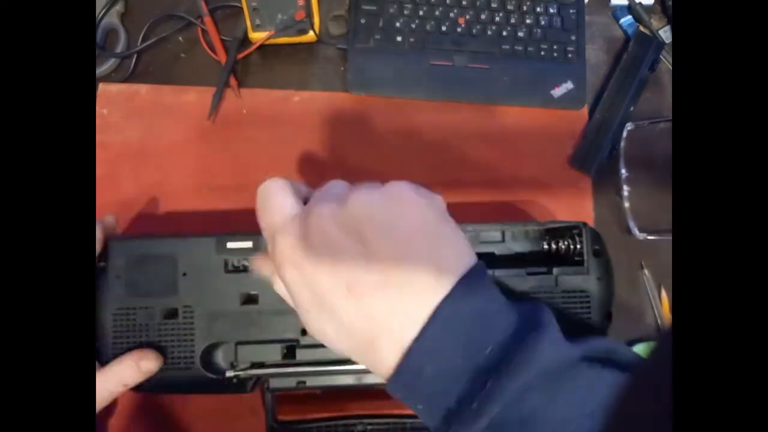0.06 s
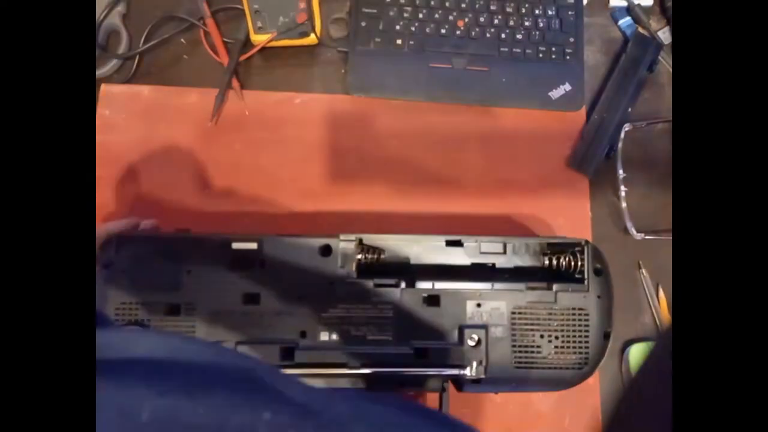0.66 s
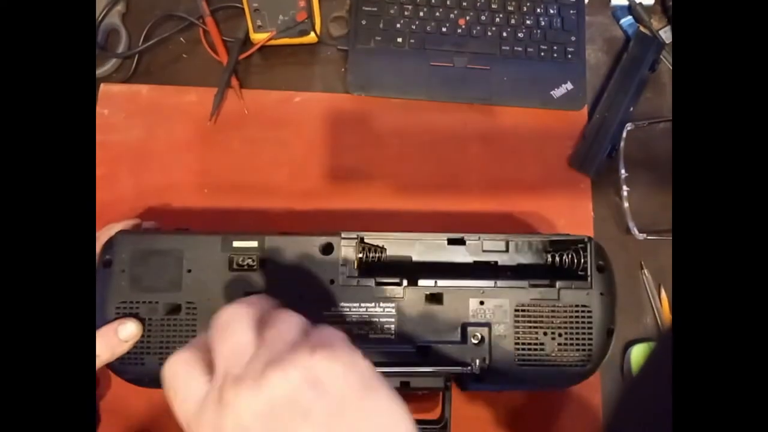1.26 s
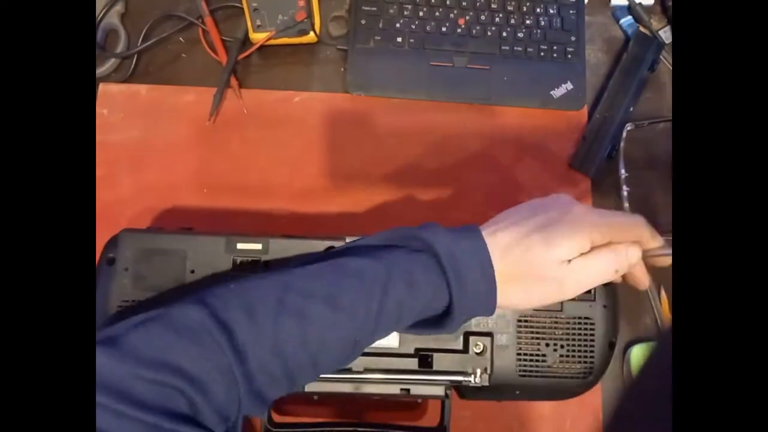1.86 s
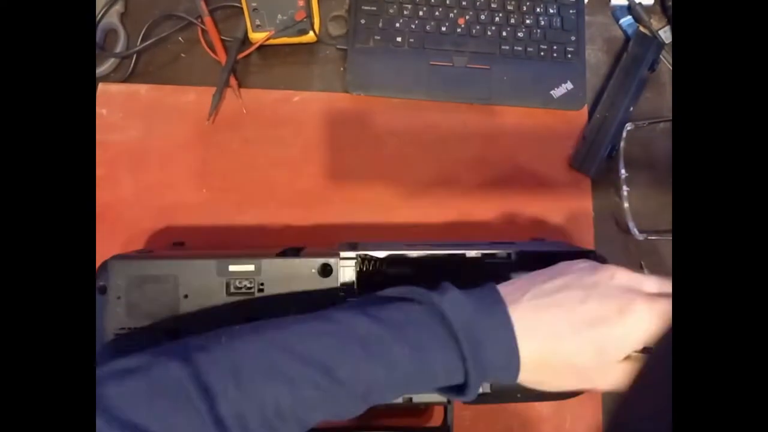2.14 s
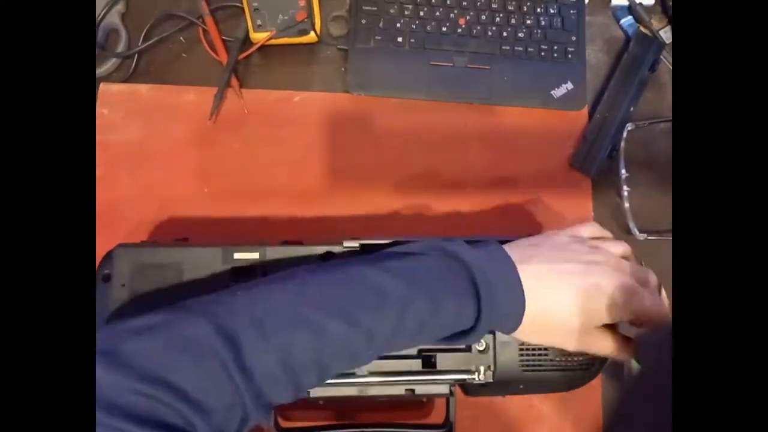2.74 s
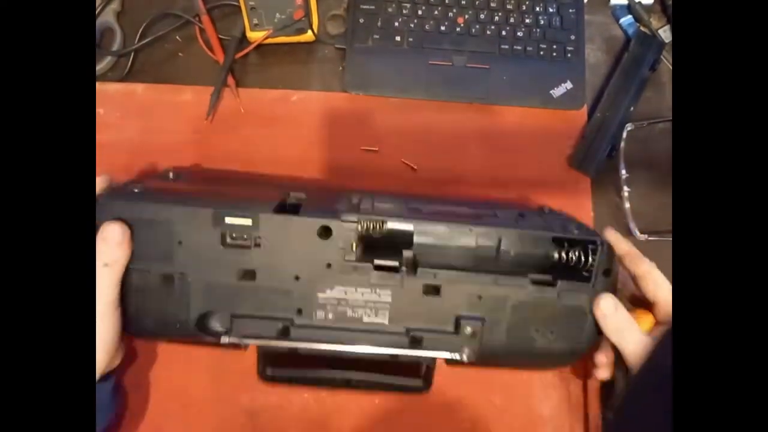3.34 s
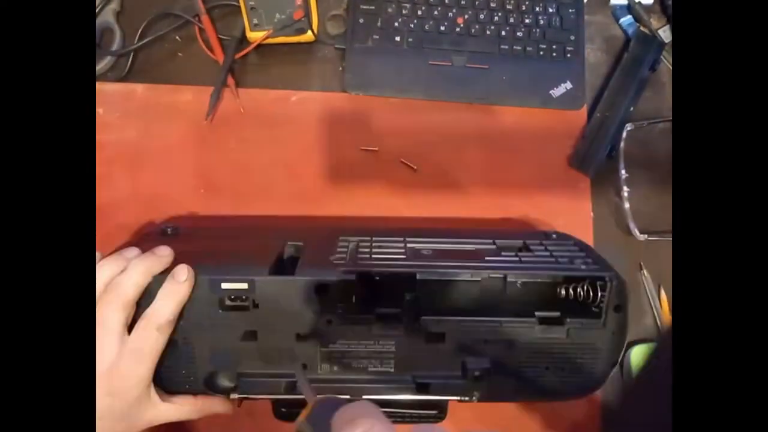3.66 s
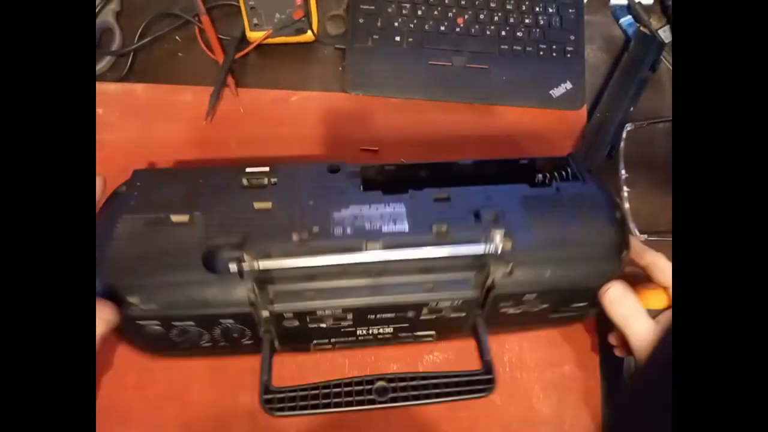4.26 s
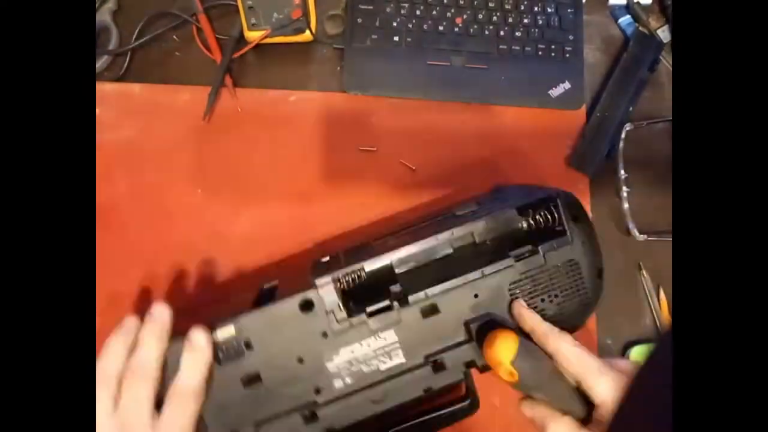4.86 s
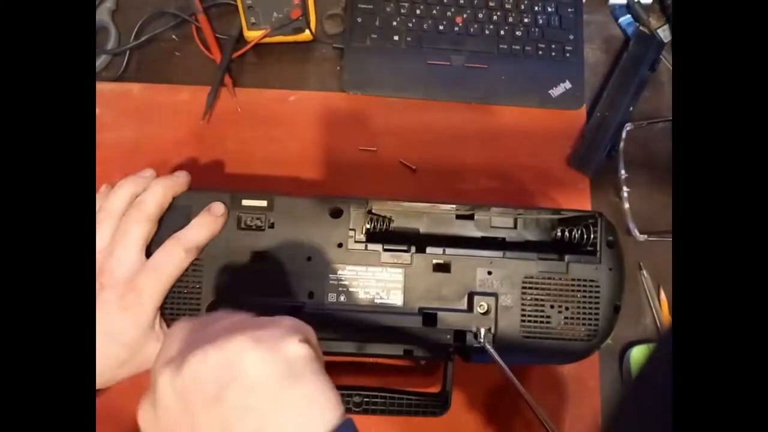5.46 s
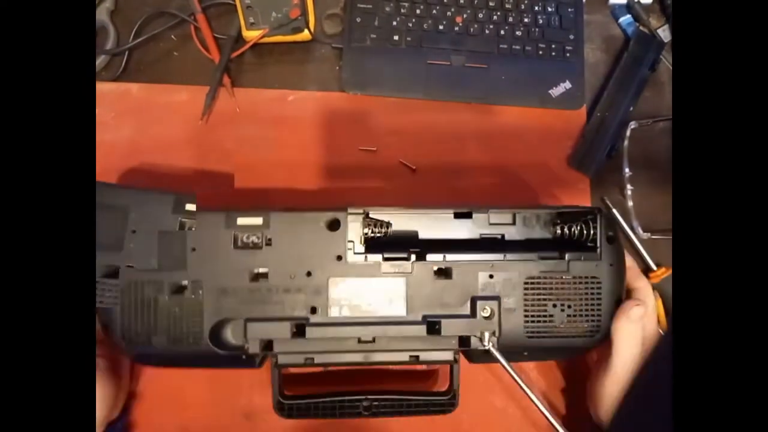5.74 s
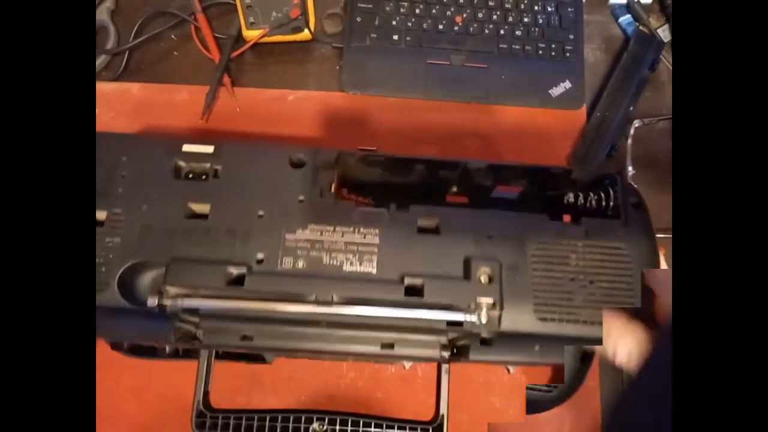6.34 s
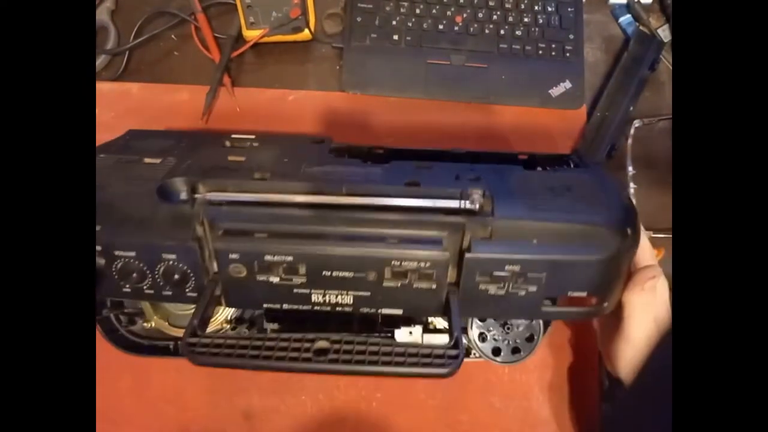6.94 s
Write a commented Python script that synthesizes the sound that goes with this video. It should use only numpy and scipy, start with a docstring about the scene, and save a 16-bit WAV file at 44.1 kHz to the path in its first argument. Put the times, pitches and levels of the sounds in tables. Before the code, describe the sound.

A screwdriver works screws out of a plastic radio case in a rapid, sped-up run of dry clicks, knocks and scrapes.

```python
"""At a workbench, a plastic radio case is unscrewed and handled at high speed.
Screwdriver, screws and shell give a rapid run of dry clicks, each a tick at the tip, a hollow knock
and a thud through the bench. Between them tool and hands stick and slip in crackling scrapes.
A few pings and tiny squeaks stand out. Underneath, the case slides on its mat, the bench rumbles
and a sleeve brushes past, over a faint room hiss."""
import sys
import numpy as np
from scipy import signal
from scipy.fft import rfft, irfft
from scipy.io import wavfile
from scipy.ndimage import uniform_filter1d

SR = 44100
rng = np.random.default_rng(int(sys.argv[2]) if len(sys.argv) > 2 else 0)


def transcribe(signal):
    """Save signal, clipped to [-1, 1], as a 16-bit WAV file at the path in sys.argv[1]."""
    frames = np.atleast_2d(signal).T
    limited = np.clip(frames, -1, 1)
    pcm = np.round(limited * 32767).astype(np.int16)
    wavfile.write(sys.argv[1], SR, pcm)


N = 308259

# strokes of tool and hands over the case: t/s, length/s, level/dB
SCRAPE_STROKES = [(0.055, 0.057, -44), (0.14, 0.066, -48), (0.295, 0.12, -44), (0.42, 0.15, -37),
                  (0.66, 0.094, -48), (0.81, 0.079, -47), (1.06, 0.027, -47), (1.12, 0.048, -47),
                  (1.345, 0.045, -53), (1.412, 0.027, -48), (1.495, 0.035, -42), (1.691, 0.027, -45),
                  (1.77, 0.11, -54), (1.92, 0.1, -48), (2.055, 0.14, -38), (2.225, 0.063, -42),
                  (2.312, 0.044, -40), (2.36, 0.13, -54), (2.492, 0.067, -44), (2.59, 0.033, -44),
                  (2.685, 0.072, -49), (2.745, 0.075, -39), (2.955, 0.18, -50), (3.229, 0.023, -34.5),
                  (3.42, 0.097, -51), (3.545, 0.095, -44), (3.722, 0.063, -41), (3.914, 0.069, -46),
                  (4.08, 0.14, -43), (4.205, 0.072, -34), (4.32, 0.07, -51), (4.54, 0.082, -51),
                  (4.69, 0.12, -56), (4.82, 0.11, -50.5), (4.972, 0.057, -42), (5.03, 0.073, -47),
                  (5.115, 0.094, -42.5), (5.26, 0.11, -36), (5.39, 0.1, -39), (5.505, 0.17, -41.5),
                  (5.76, 0.092, -58), (5.852, 0.028, -46.5), (6.02, 0.13, -51.5), (6.18, 0.093, -56.5),
                  (6.31, 0.12, -50), (6.57, 0.16, -63.5)]


def clicks(touch_db=-25, rebound_db=-19, rebound_s=.0045):
    """Tool, screws and case collide: a light first touch, the blow, a weak rebound as the part drops."""
    # t/s, tick level over 5 ms/dB, knock re tick/dB, thud re tick/dB, treble tilt/(dB per octave)
    blows = [(0.0223, -37.5, -23, -31.5, 3.5), (0.075, -33.5, -25, -28, 29), (0.0849, -39.5, -32, -18, 26),
             (0.151, -34, -13.5, -25, 1.5), (0.2214, -45, -9, -8.5, -5), (0.2682, -21, -16, -22, 2.5),
             (0.2987, -31.5, -21, -22.5, 3), (0.3163, -28, -20, -22.5, 12.5), (0.3593, -33.5, -28, -52, 10),
             (0.6654, -36, -11, -31, -3.5), (0.6836, -27.5, -16.5, -18, 2), (0.7237, -40, -14, -20, 8),
             (0.7315, -33, -15.5, -24.5, 0), (0.785, -34, -17, -29, 7), (0.8278, -38.5, -32, -49, 15),
             (0.878, -37.5, -14.5, -31, 3), (1.0776, -22.5, -25, -30.5, 1),
             (1.1216, -42.5, -9.5, -12.5, -5), (1.129, -39, -22, -17, -5.5), (1.1701, -41, -12, -15, -11),
             (1.201, -29.0, -15.5, -24.5, 2), (1.2616, -38.5, -16, -17, -4), (1.3092, -35.5, -16, -17, 2),
             (1.3223, -32.5, -11, -20, -7), (1.4298, -22.5, -22, -32.5, 10), (1.514, -32.5, -40, -24.5, 9),
             (1.5284, -40.5, -45, -20, 12), (1.7047, -21, -17, -21, 8), (1.7472, -34, -19, -29, 15),
             (1.771, -40.5, -13, -9, -2), (1.7997, -32, -17, -21, 5), (1.9206, -38.5, -13, -32, -1),
             (1.943, -29.5, -15, -25.5, 3), (1.9992, -27.5, -14, -30, 3), (2.102, -31, -19, -33, 5),
             (2.1102, -27, -21, -21, 0), (2.1359, -30.0, -16, -19, 5), (2.1884, -24, -11.5, -12.5, 2.5),
             (2.2481, -34.5, -11.5, -14.5, 1), (2.2692, -30, -16, -19, 0), (2.2764, -40, -17, -15, -9),
             (2.3191, -30.5, -13.5, -12.5, 3), (2.3285, -32, -13, -15, -12), (2.3978, -45.5, -11, -12, -9),
             (2.4421, -38, -15, -15.5, -3), (2.5212, -36, -13, -15, -6),
             (2.5501, -32.5, -18.5, -11.5, -10.5), (2.595, -32, -8.5, -10.5, -2), (2.6091, -40, -6, -13, 2),
             (2.6699, -43.5, -11, -23, 11), (2.8089, -37.5, -16, -13.5, -4), (2.8591, -37, -8.5, -19, 5),
             (2.878, -36, -10, -28.5, 6), (2.903, -20.5, -3.5, -21, 5), (2.9089, -24, 2, -6.5, -9),
             (2.9217, -17.5, -4.5, -32.5, -4.5), (3.0121, -17, -13, -44.5, 10),
             (3.0452, -32.5, -14, -19.5, -1), (3.1235, -47, -2.5, 0, -14), (3.1642, -42, -14, -20, 7.5),
             (3.2372, -26, 2.5, -25.5, -5), (3.2418, -26.5, -5.5, -6, 8), (3.394, -27.0, -8, -33.5, 3.5),
             (3.441, -20.5, -18.5, -22, 3.5), (3.5458, -35.5, -14.5, -16, 1), (3.5642, -35, -15, -19, -3),
             (3.6097, -33.0, -11, -12, -6), (3.6295, -38, -8, -14.5, -13), (3.641, -30.5, -15, -19.5, -6),
             (3.6704, -37, -10.5, -11, 3), (3.7366, -19.5, -18, -23.5, 3.5), (3.7726, -34.0, -24, -25, 9),
             (3.8148, -37.5, -12.5, -19.5, 2), (3.8729, -51.5, -32, -40, 1),
             (3.9243, -15.5, -27.5, -36.5, 11), (3.9297, -19, -24.5, -34.5, 6), (4.0063, -47, -14, -24, -2),
             (4.0801, -37, -19, -34, 0), (4.1218, -26, -5, -15.5, -4), (4.226, -27.5, -17.5, -14, -6),
             (4.2653, -29, -30, -21, -2), (4.3019, -41.5, -4.5, -10, -3), (4.325, -23, -8, -13, 13),
             (4.3313, -28, -10, -13, -12), (4.3369, -31.5, -3, -15, 7), (4.347, -28, -5, -28, 4),
             (4.352, -32, -12, -28, 5), (4.3731, -24, -8.5, -28.5, 3), (4.4323, -27.5, -8, -20, -0.5),
             (4.4538, -29, -11, -19, -1), (4.5464, -35, -6.5, -19.5, -2), (4.557, -28.5, -4, -31, -13),
             (4.5656, -31, -5, -22, -17), (4.6073, -36.5, -12, -50, -3.5), (4.8281, -36, -11, -22.5, 0.5),
             (4.8894, -37, -16, -20.5, -2), (4.9728, -27, -13, -28, 3), (5.0036, -24.5, -9.5, -12, -4),
             (5.0711, -36, -19.5, -30, 6), (5.146, -30.5, -12.5, -16, -1), (5.169, -35.5, -6.5, -9.5, -12),
             (5.2236, -39.5, -12.5, -27, 6), (5.3929, -29, -14, -19.5, -1.5), (5.418, -24.5, -7.5, -17, -5),
             (5.4522, -25, -14.5, -18, -2), (5.5326, -31.5, -28, -26, -1.5), (5.636, -29.5, -24, -24.5, 1),
             (5.7218, -29, -7.5, -28, -9.5), (5.7277, -32.5, -8, -23, -8), (5.8069, -30.0, -4, -15.5, 16),
             (5.8174, -35, -3, -13, -7), (5.869, -33, -4.5, -17.5, 2), (5.9178, -45, -14.5, -18, -0.5),
             (5.9803, -48, -6.5, -10.5, 0), (6.0727, -34, -8, -19, -2), (6.0922, -27.5, -3, -17, -3),
             (6.1293, -28.5, -15.5, -11.5, 0), (6.2319, -32, -6.5, -21, 4.5), (6.317, -32, -14.5, -22, 3.5),
             (6.4475, -44, -2.5, -18, -14), (6.457, -42, -5, -21, -7), (6.6281, -47, -1, -3.5, -7.5)]
    out = np.zeros((2, N))
    for start, db, knock_db, thud_db, tilt_db in blows:
        blow = amp(db) * contact(knock_db, thud_db, tilt_db, ring_db=-11.5)
        rebound = amp(db + rebound_db) * contact(knock_db, thud_db, tilt_db, ring_db=-8.5)
        add(out, start, blow)
        add(out, start - rng.uniform(.0015, .0041), amp(touch_db) * blow)
        add(out, start + rebound_s * rng.uniform(.65, 1.1), rebound)
    return out


def contact(knock_db, thud_db, tilt_db, ring_db, detune=.006):
    """One hit in three layers: a tick at the tip, a knock of the hollow shell, a thud in the bench."""
    # tone of the bright tick, the midrange knock and the low thud: f/Hz, level/dB
    tick_eq = [(1500, -60.5), (3300, -13.5), (4700, -5), (6000, 3.5), (7500, 1.5), (9100, 3), (10300, 1),
               (12500, 8), (14500, -0.5), (16000, -6.5), (17000, -25)]
    knock_eq = [(400, -41.5), (850, -10), (1300, -3), (1600, 0), (2000, -1.5), (2600, -0.5), (3200, -3),
                (4500, -6.5), (8000, -31)]
    thud_eq = [(15, -2), (50, -2), (130, 1), (300, -0.5), (550, -0.5), (850, -0.5), (1500, -9.5),
               (4000, -48)]
    # resonant peaks and dips of the tip: f/Hz, width/Hz, level/dB
    tip_modes = [(7520, 300, 5.5), (8100, 560, 4), (9190, 360, 5), (12430, 1400, -4.5), (13500, 300, -1)]
    # each spot detunes the tip a little and favours one extra resonance in tip and shell
    tip = [(hz * (1 + detune * rng.standard_normal()), width, db) for hz, width, db in tip_modes]
    tip.append((rng.uniform(6600, 13500), 900, 4))
    panel = [(rng.uniform(1250, 2700), 260, 5)]
    tick = impact(tick_eq, tip, snap=(-7, .0004), ring=(ring_db, .0022), likeness=.72, tilt_db=tilt_db)
    knock = impact(knock_eq, panel, snap=(-9.5, .00099), ring=(-7.5, .0021), likeness=.45)
    thud = impact(thud_eq, [], snap=(-2, .00028), ring=(-19, .0026), likeness=.048)
    tick_pan, thud_pan = amp([[.5], [-.5]]), amp([[1.5], [-1.8]])
    return tick * tick_pan + amp(knock_db) * knock + amp(thud_db) * thud * thud_pan


def impact(eq, modes, snap, ring, likeness, tilt_db=0, room=(-46, .0088), size=1024):
    """An impulse with a noisy snap, a ring of crowded modes and a room tail, each (level/dB, decay/s)."""
    t = np.arange(size) / SR
    hz = abs(np.fft.fftfreq(2 * size, 1 / SR))
    power = sum((amp(db) * np.exp(-t / decay_s)) ** 2 for db, decay_s in [snap, ring, room])
    drive = stereo_noise(size, likeness) * np.sqrt(power) + (t == 0)
    modes_db = sum(db / (1 + (2 * (hz - centre) / width) ** 2) for centre, width, db in modes)
    treble_db = tilt_db * np.log2(np.maximum(hz, SR / 10) / SR)  # flat below 4.4 kHz
    gain = eq_gain(eq, hz) * amp(modes_db + treble_db)
    response = np.exp(np.conj(signal.hilbert(np.log(gain))))  # minimum phase keeps the attack sharp
    sound = irfft(rfft(drive, 2 * size) * response[:size + 1])[:, :size]
    polarity = rng.choice([-1, 1])
    power_over_5ms = np.sum(sound ** 2) / 2 / (.005 * SR)
    return polarity * sound / np.sqrt(power_over_5ms)


def scrapes(boost_db=1, firm_db=-40, firm_slips_per_s=200, rub_db=-11):
    """Stick and slip: separate ticks under a light touch, a dense rasp and fine rub under a hard one."""
    # tone of the fine, high rub: f/Hz, level/dB
    rub_eq = [(180, -54), (300, -24), (1300, -14), (1560, -14.5), (2030, -29.5), (2700, -3), (3890, -16.5),
              (4590, -16), (6000, -13.5), (7080, -5.5), (8090, 6.5), (9240, -2.5), (10200, -13),
              (12500, 8.5), (16000, -3.5)]
    effort = amp(boost_db) * gestures(SCRAPE_STROKES, attack_s=.006, release_s=.01, start_db=-4, end_db=-3)
    firmness = effort / amp(firm_db)
    per_s = np.clip(firm_slips_per_s * firmness ** .77, 30, 600)
    rasp = slips(effort, per_s, spread_db=4, knock_db=-17, thud_db=-25, tilt_db=1)
    rub = noise_bed(amp(firm_db + rub_db) * firmness ** 1.86, rub_eq, likeness=.7)
    return rasp + rub * judder(depth_db=3.5, samples=200)


def slips(effort, per_s, spread_db, knock_db, thud_db, tilt_db, vary_db=3.5, spots=12, most=4000):
    """Little catches, uneven in spacing and size, each on one of a few spots of the case."""
    gaps = rng.gamma(2, .5, most)
    sizes = unit_rms(amp(spread_db * rng.standard_normal(most)))
    spot_of_slip = rng.integers(0, spots, most)
    onsets = np.searchsorted(np.cumsum(per_s) / SR, np.cumsum(gaps))
    out = np.zeros((2, N))
    for spot, (hollow_db, sharp_db) in enumerate(rng.standard_normal((spots, 2)) * vary_db):
        # more ring makes a slip blunter than a blow
        grain = contact(knock_db + hollow_db, thud_db + hollow_db, tilt_db + sharp_db, ring_db=-8)
        grain = grain / np.linalg.norm(grain[0])
        here = (spot_of_slip == spot) & (onsets < N)
        for i, size in zip(onsets[here], sizes[here]):
            add(out, i / SR, size * effort[i] * np.sqrt(SR / per_s[i]) * grain)
    return out


def fingers(level_db=-64, ticks_per_s=55):
    """Fingers tick faintly on the plastic, from just before each stroke to just after it."""
    strokes = gestures(SCRAPE_STROKES, attack_s=.006, release_s=.01, start_db=0, end_db=0)
    touching = (strokes > amp(level_db)).astype(float)
    effort = amp(level_db) * np.sqrt(abs(uniform_filter1d(touching, size=4000)))
    return slips(effort, np.full(N, ticks_per_s), spread_db=.5, knock_db=-7, thud_db=-13.5, tilt_db=-1.5)


def pings():
    """Some blows set one part ringing briefly at one pitch: a shell panel low, a screw high."""
    # ringing parts: t/s, f/Hz, level/dB, time to fall 60 dB/s
    rings = [(0.2685, 760, -37.5, .018), (1.2011, 8520, -46, .06), (1.707, 8310, -38, 0.07),
             (1.7053, 11200, -40, 0.07), (1.998, 8796, -38, 0.08), (2.922, 8600, -38.5, 0.05),
             (3.0141, 2100, -21.5, 0.015), (3.2373, 1510, -19.5, 0.0079), (3.3934, 1340, -26.5, 0.016),
             (3.7359, 8554, -46.5, 0.1), (4.4319, 9600, -43, 0.042), (4.5568, 5890, -20, 0.027)]
    out = np.zeros((2, N))
    t = np.arange(SR // 8) / SR
    for start, hz, db, t60 in rings:
        add(out, start, amp(db - 60 * t / t60)[None] * np.sin(2 * np.pi * hz * t))
    return out


def squeaks(roughness=.53, waver=.13, harmonics=5):
    """Tiny rough chirps that slide down unsteadily, their harmonics strongest near 5 kHz."""
    # t/s, length/s, first f/Hz, last f/Hz, level/dB
    chirps = [(6.747, 0.008, 2270, 1630, -62.5), (6.761, 0.021, 2120, 1970, -64.5),
              (6.8, 0.0047, 2480, 2430, -53), (6.807, 0.012, 3280, 2730, -64.5)]
    eq = [(2000, -7), (5000, 3), (7500, -2.5), (10000, -4.5), (13000, -26)]  # f/Hz, level/dB
    out = np.zeros((2, N))
    for start, length, first_hz, last_hz, db in chirps:
        size = round(length * SR)
        wobble = 1 + waver * uniform_filter1d(rng.standard_normal(size), size=24)
        hz = np.linspace(first_hz, last_hz, size) * wobble
        phase = 2 * np.pi * np.cumsum(hz) / SR
        tone = sum(eq_gain(eq, k * hz) * np.cos(k * phase) for k in range(1, harmonics + 1))
        chirp = unit_rms(tone) + roughness * stereo_noise(size, likeness=.27)
        add(out, start, amp(db) * unit_rms(chirp * signal.windows.tukey(size, .7)))
    return out


def sliding_case():
    """The shell judders over the bench mat with a hollow rub."""
    # pushes across the mat: t/s, length/s, level/dB
    slides = [(0.0, 0.079, -68), (4.68, .14, -66), (5.52, .28, -60), (6.02, 0.071, -63),
              (6.47, 0.19, -62.5)]
    # tone of the hollow rub: f/Hz, level/dB
    slide_eq = [(40, -29), (480, -9), (640, 2), (750, -3), (900, 1.5), (1300, -5), (1900, -3), (3000, -10),
                (6000, -17), (16000, -48)]
    effort = gestures(slides, attack_s=.014, release_s=.065, start_db=-4, end_db=-10)
    return noise_bed(effort, slide_eq, likeness=.25) * judder(depth_db=6, samples=700)


def bench_rumble():
    """The bench rumbles unevenly as the case is shifted and pulled apart."""
    # shifts of the case: t/s, length/s, level/dB
    heaves = [(5.64, 0.077, -64), (5.8, 0.48, -75.5), (6.3, .69, -73)]
    # low-end body of the bench: f/Hz, level/dB
    bench_eq = [(15, -5), (35, -10), (65, 4.5), (120, -9), (250, -8), (500, -14.5), (1500, -31.5),
                (6000, -72)]
    effort = gestures(heaves, attack_s=.016, release_s=.032, start_db=-.5, end_db=-.5)
    return noise_bed(effort, bench_eq, likeness=.29) * judder(depth_db=4.5, samples=2400)


def sleeve():
    """A sleeve brushes past in soft swishes."""
    # passes of the arm: t/s, length/s, level/dB
    swishes = [(.8, 0.2, -68.5), (4.47, 0.43, -65.5)]
    # tone of the cloth: f/Hz, level/dB
    cloth_eq = [(600, -27.5), (1100, 3.5), (1900, 6), (3000, -1), (4200, -10), (6000, -3.5), (16000, -14)]
    effort = gestures(swishes, attack_s=.05, release_s=.06, start_db=-3, end_db=-3)
    return noise_bed(effort, cloth_eq, likeness=.45)


def room_hiss():
    """Faint, wide room tone that slowly sinks away."""
    # fade of the hiss: t/s, level/dB
    fade = [(0, -68), (1.6, -73), (4.0, -74), (5.4, -74), (5.95, -75), (7, -82)]
    # tone of the hiss: f/Hz, level/dB
    hiss_eq = [(30, -22), (700, -22), (1100, -5), (1800, 0), (2800, -3), (3800, -10), (5200, -8),
               (8000, -13), (16000, -18)]
    level_db = np.interp(np.arange(N) / SR, *np.transpose(fade))
    return noise_bed(amp(level_db), hiss_eq, likeness=.15)


def gestures(moves, attack_s, release_s, start_db, end_db, peak_share=.65):
    """Envelope from rows of t/s, length/s, level/dB: each move catches, swells and lets go."""
    out = np.zeros((1, N))
    for start, length, db in moves:
        t = np.arange(0, length + release_s / 2, 1 / SR)
        swell_db = np.interp(t / length, [0, peak_share, 1], [start_db, 0, end_db])
        gate = np.clip(t / attack_s, 0, 1) * np.clip((length - t) / release_s + .5, 0, 1)
        add(out, start, (gate * amp(db + swell_db))[None])
    return out[0]


def judder(depth_db, samples):
    """A random gain that swells and sinks within about this many samples."""
    drift = uniform_filter1d(rng.standard_normal(N), size=samples)
    drift = unit_rms(uniform_filter1d(drift, size=samples // 2))
    return amp(depth_db * np.clip(drift, -2, 2))


def noise_bed(envelope, eq, likeness):
    """Equalised stereo noise that rides an envelope."""
    spectrum = rfft(stereo_noise(N, likeness)) * eq_gain(eq, np.fft.rfftfreq(N, 1 / SR))
    return envelope * unit_rms(irfft(spectrum, N))


def stereo_noise(size, likeness):
    """White noise, from fully wide (likeness 0) to mono (1)."""
    shared, own = rng.standard_normal(size), rng.standard_normal((2, size))
    return np.sqrt(likeness) * shared + np.sqrt(1 - likeness) * own


def eq_gain(eq, hz):
    """Gain at each frequency from rows of f/Hz, level/dB."""
    f, db = np.transpose(eq)
    return amp(np.interp(np.log(hz + 1), np.log(f), db))


def add(mix, start_s, sound):
    part = mix[:, max(round(start_s * SR), 0):][:, :sound.shape[1]]
    part += sound[:, :part.shape[1]]


def amp(db):
    return 10 ** (np.asarray(db) / 20)


def unit_rms(x):
    return x / np.sqrt(np.mean(x ** 2) + 1e-20)


def scene():
    """Clicks and scrapes up front, over the sliding case, the bench, the sleeve and the room."""
    room = room_hiss()
    handling = clicks() + scrapes() + fingers() + pings() + squeaks()
    return handling + sliding_case() + bench_rumble() + sleeve() + room


def record(dry, ceiling=.9, cutoff_hz=16600):
    """Clip any peak at the ceiling and cut the extreme top end."""
    lowpass = signal.firwin(301, cutoff_hz, window=("kaiser", 9), fs=SR)
    return signal.oaconvolve(np.clip(dry, -ceiling, ceiling), lowpass[None], "same")


dry = scene()
out = record(dry)
transcribe(out)
```